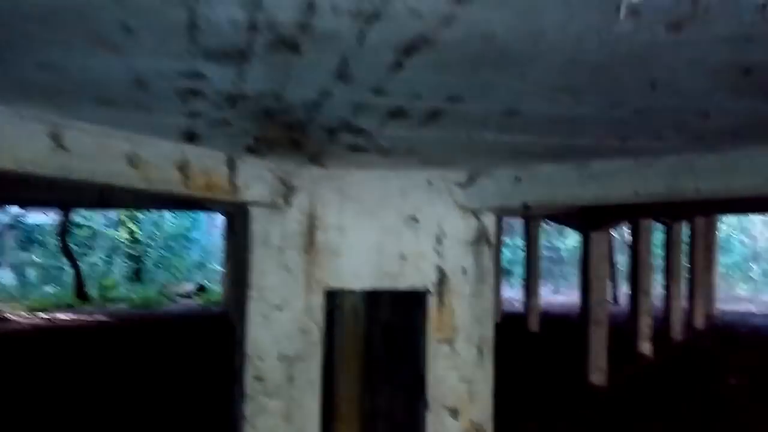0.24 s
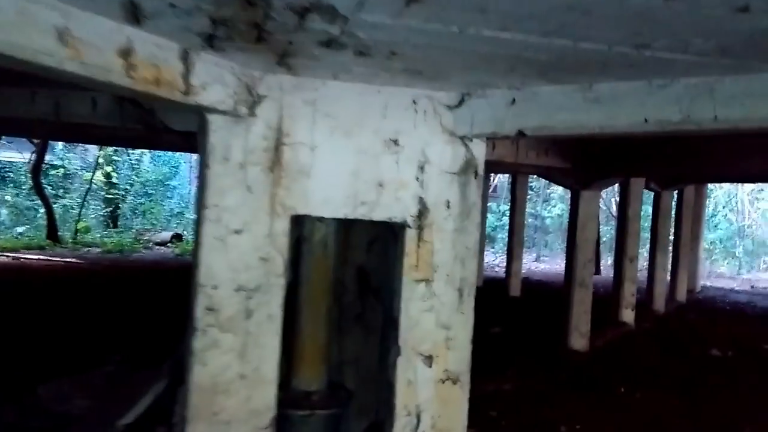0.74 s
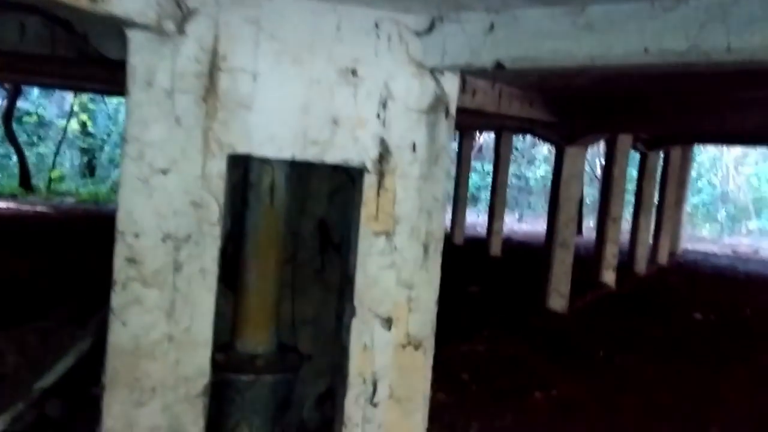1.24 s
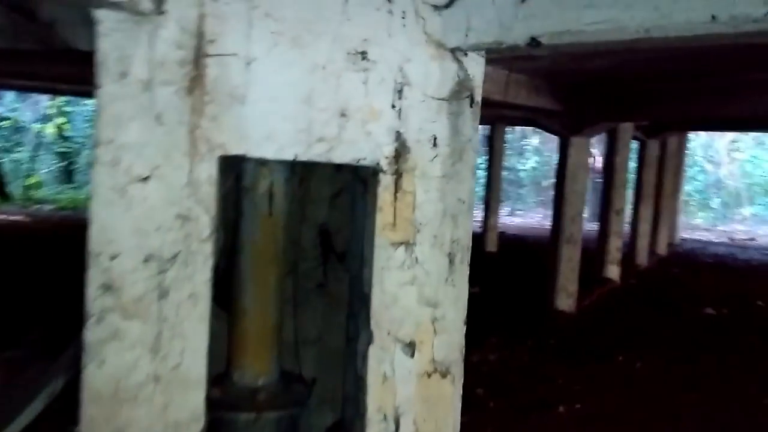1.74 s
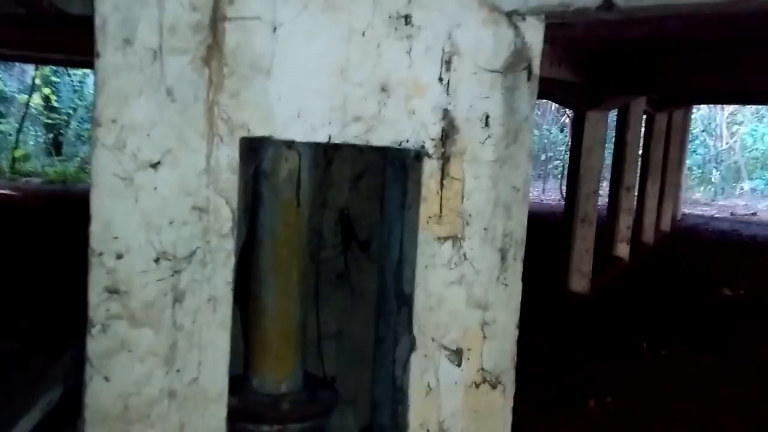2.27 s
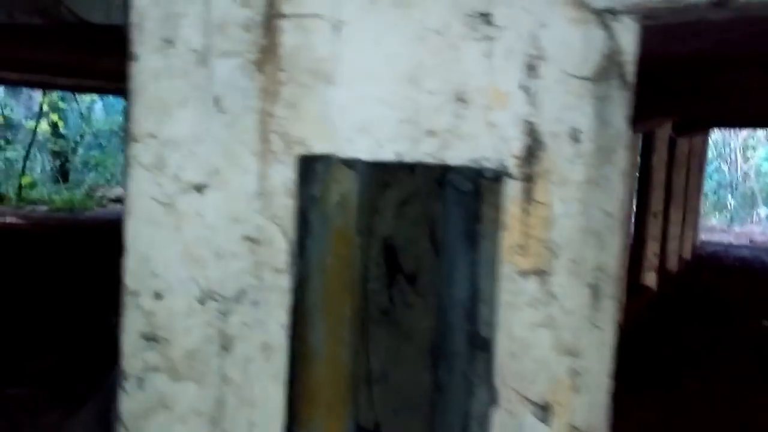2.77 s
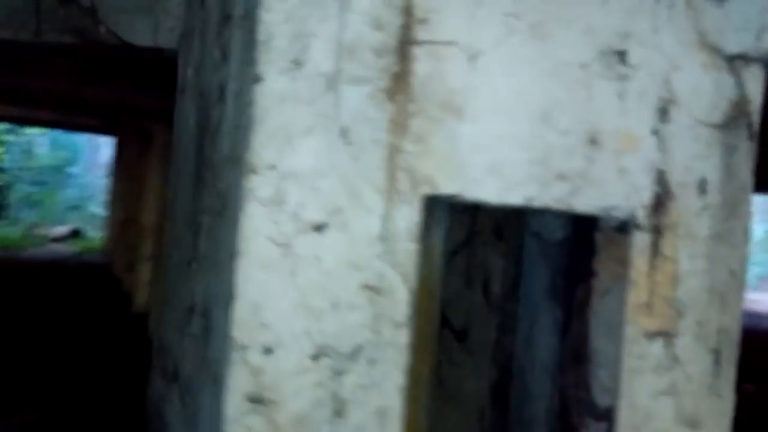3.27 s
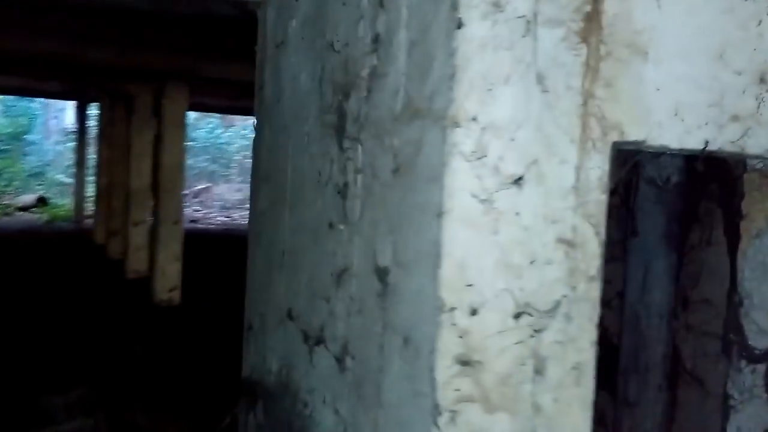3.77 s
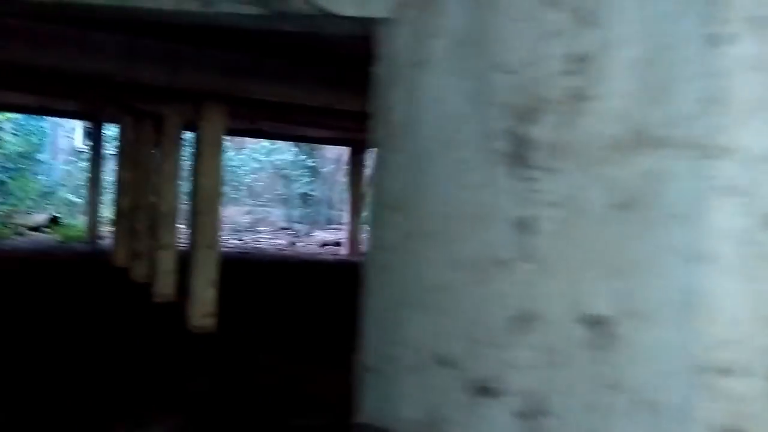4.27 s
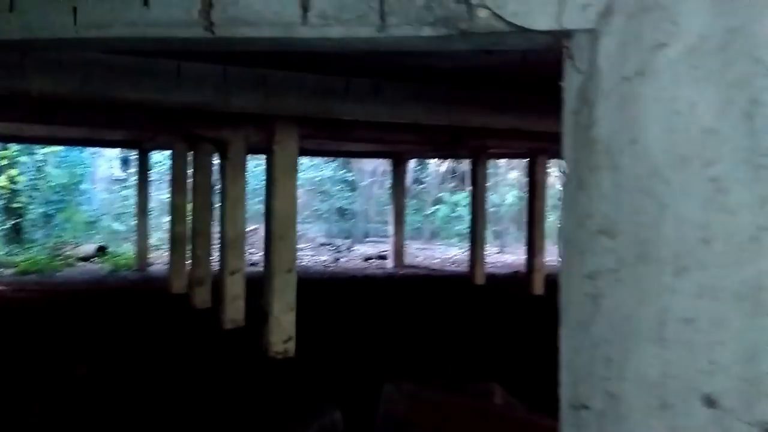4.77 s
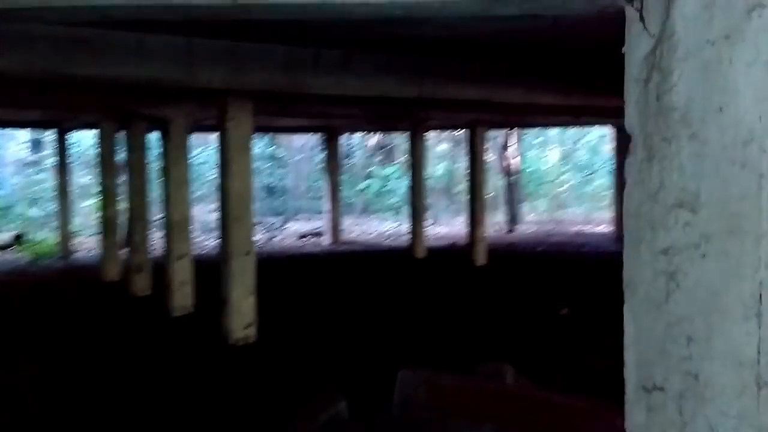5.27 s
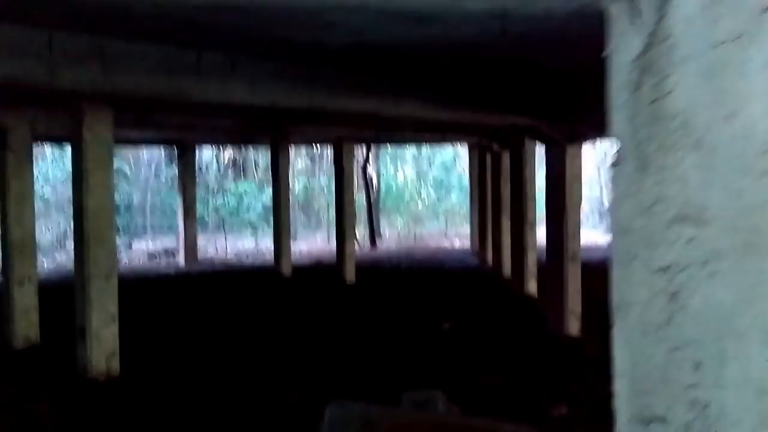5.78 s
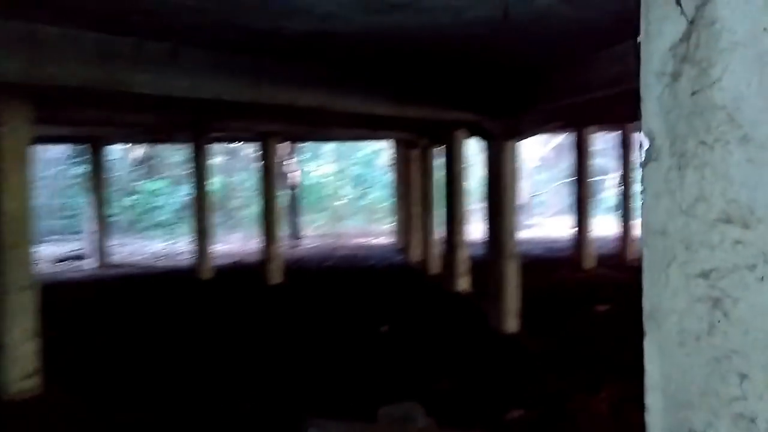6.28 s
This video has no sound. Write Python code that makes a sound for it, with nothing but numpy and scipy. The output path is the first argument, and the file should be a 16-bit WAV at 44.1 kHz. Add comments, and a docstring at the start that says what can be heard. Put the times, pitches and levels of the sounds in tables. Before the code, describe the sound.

Close, dry footsteps grind over rubble in an open concrete hall. Light chinks and snaps come first, then the crunching thickens to a dense, sharp crackle midway. A shard slides with a faint squeak, steps become sparser, and single hard cracks with dull thuds end it. Short bright echoes follow. Far traffic and one heavy engine hum low under faint hiss, picked up by a handheld microphone near the walker.

```python
"""Slow footsteps on a rubble-strewn floor in an empty concrete hall: damped rings, dense as crushed crumbs and grit.
Shards snap as runs of ringing cracks; loose pieces chink, slide, thud; thin flakes rustle; sand grains pop.
Decaying noise tails give the hall's answer. A far road rumbles as shaped noise beneath a faint hiss,
with one heavy engine, harmonics plus roar, that eases off and then pulls away."""
import sys
import numpy as np
from scipy import signal
from scipy.fft import rfft, irfft, next_fast_len
from scipy.io import wavfile
from scipy.ndimage import uniform_filter1d, map_coordinates

SR = 44100
rng = np.random.default_rng(int(sys.argv[2]) if len(sys.argv) > 2 else 0)


def wav_record(signal):
    """Record a signal, one row per channel, as 16-bit PCM in the file named by sys.argv[1]."""
    frames = np.transpose(np.atleast_2d(signal))
    bounded = np.clip(frames, -1, 1)
    # unit amplitude maps onto the largest positive 16-bit level
    quanta = np.round(bounded * 32767).astype(np.int16)
    wavfile.write(sys.argv[1], SR, quanta)


N = 287355

# All table levels are relative; gains in the code set the final ones.
# Spectrum of crushed crumbs: f/Hz, density/dB per Hz
CRUMBS = [(300, -48), (650, -40), (1000, -8.5), (1500, 0), (2000, 4), (2800, -1), (3600, 4.5), (4600, 0.5),
          (6500, 10), (14000, -48.5)]
# Spectrum of ground grit: f/Hz, density/dB per Hz
GRIT = [(1000, -17), (3000, -6.5), (4800, 1.5), (6200, -2), (8000, 3.5), (10500, 3.5), (12300, 2),
        (13500, -8), (15000, -29)]


def amp(db):
    """Decibels to gain."""
    return 10 ** (np.asarray(db) / 20)


def unit(x):
    """x at rms 1."""
    return x / np.sqrt(np.mean(x ** 2) + 1e-20)


def along(points, hz):
    """(Hz, value) points interpolated on a log-frequency axis."""
    f, v = np.transpose(points)
    return np.interp(np.log(hz + 1), np.log(f + 1), v)


def curves(rows):
    """One value per sample for each column after the time."""
    s, *cols = np.transpose(rows)
    return [np.interp(np.arange(N) / SR, s, c) for c in cols]


def wobble(knots_per_s):
    """Smooth random curve through normal-distributed knots."""
    knots = rng.standard_normal(int(N * knots_per_s / SR) + 4)
    return map_coordinates(knots, [np.arange(N) * knots_per_s / SR])


def filtered(x, response):
    """x times a response of frequency."""
    n = x.shape[-1]
    m = next_fast_len(n + 8192)
    return irfft(rfft(x, m) * response(np.fft.rfftfreq(m, 1 / SR)), m)[..., :n]


def coloured(x, points):
    """x shaped by (Hz, dB) points, at rms 1."""
    return unit(filtered(x, lambda hz: amp(along(points, hz))))


def add(track, s, sound):
    """Mix a sound into a track from time s."""
    start = max(round(s * SR), 0)
    room = track[..., start:start + sound.shape[-1]]
    room += sound[..., :room.shape[-1]]


def spiky(shape, scatter_db, size=12):
    """Noise of rms 1 in short spikes, size samples each, of unequal strength."""
    rows, length = shape
    spikes = np.repeat(rng.standard_normal((rows, length // size + 1)), size, axis=1)[:, :length]
    return unit(rng.standard_normal(shape) * amp(scatter_db * np.minimum(spikes, 2)))


def narrow(hz, knots_per_s):
    """Narrow-band noise of rms 1 about a steady or moving pitch; faster knots widen the band."""
    phase = 2 * np.pi * np.cumsum(hz * np.ones(N)) / SR
    return unit(wobble(knots_per_s) * np.sin(phase) + wobble(knots_per_s) * np.cos(phase))


def grains(rate, hz, spread, cycles, scatter_db, size=160):
    """Tiny fractures: damped rings, rate per s, at random times, pitches (+-spread octaves), strengths; rms 1."""
    when, pitch, strength, sign = rng.random((int(rate * N / SR), 4)).T
    f = np.clip(hz * 2 ** (spread * (2 * pitch - 1)), 50, SR / 2)[:, None]
    turns = f * np.arange(size) / SR
    gain = np.sign(sign - .5) * amp(scatter_db * np.minimum(-np.log(1 - strength), 5))
    rings = gain[:, None] * np.sin(2 * np.pi * turns) * np.exp(-turns / cycles)
    index = (when * N).astype(int)[:, None] + np.arange(size)
    return unit(np.bincount(index.ravel(), rings.ravel(), N)[:N])


def patchy(x, depth_db, span_hz=260, life_s=0.032):
    """Colour that shifts in random gain patches over time and pitch; rms 1."""
    hz, t, z = signal.stft(x, SR, nperseg=512)
    rows, columns = np.meshgrid(hz / span_hz, t / life_s, indexing="ij")
    field = map_coordinates(rng.standard_normal((230, 700)), [rows, columns])
    return unit(signal.istft(z * amp(depth_db * field), SR, nperseg=512)[1][:N])


def splinter(x, life_s, count=7):
    """Share the energy of one crack among a run of cracks that weaken with delay."""
    age = np.append(0, rng.uniform(0, 2, count))
    weight = np.exp(-age) * np.append(1, rng.uniform(-1, 1, count))
    run = np.zeros(len(x))
    for a, w in zip(age, weight):
        run += w * np.pad(x, (round(a * life_s * SR), 0))[:len(x)]
    return run * np.linalg.norm(x) / np.linalg.norm(run)


def press(s, length_s, release_s):
    """Envelope of a sole on the floor: exponential rise up to time s, hold, exponential release."""
    attack_s = 0.015  # time constant, as is release_s
    t = np.arange(N) / SR - s
    log_gain = np.minimum(t, 0) / attack_s - np.maximum(t - length_s, 0) / release_s
    return np.exp(np.maximum(log_gain, -np.log(1e9)))


def echo(x, early_db=5, early_s=0.0039):
    """Hall's (mid, side) answer: dense reflections from floor and pillar, then a tail with its own t60 per band."""
    # Decay: f/Hz, t60/s
    hall = [(200, 0.073), (1300, 0.32), (4000, 0.27), (12000, 0.17)]
    hz, t, z = signal.stft(spiky((2, SR * 3 // 4), scatter_db=4), SR, nperseg=256)
    decay = amp(-60 * t / along(hall, hz)[:, None]) * (1 + amp(early_db) * np.exp(-t / early_s))
    decay /= np.linalg.norm(decay, axis=1, keepdims=True)
    tail = signal.istft(z * decay, SR, nperseg=256)[1]
    tail = np.pad(tail / np.linalg.norm(tail[0]), ((0, 0), (70, 0)))  # delay in samples
    return signal.fftconvolve(x[None], tail, axes=1)


def port(x, notch_hz, depth=0.87, fade_hz=9500):
    """Inverted echo in a microphone's duct: evenly spaced notches, shallower toward the treble."""
    return filtered(x, lambda hz: 1 - depth * np.exp(-(hz / fade_hz) ** 2 - 2j * np.pi * hz / notch_hz))


def hiss():
    """Faint (mid, side) noise with a slightly wavering level."""
    # Spectrum: f/Hz, density/dB per Hz
    spectrum = [(200, 0), (1300, 0), (3300, 13), (5000, 23), (9000, 14), (10300, 6), (11300, 30),
                (12500, 31), (14500, 12)]
    return amp(-70.5 + 0.8 * wobble(7)) * coloured(rng.standard_normal((2, N)), spectrum)


def traffic(rumble_db=-56, roar_db=-5):
    """Patchy road rumble; an engine's exhaust roar and fluttering cycle-rate harmonics swell as it pulls."""
    # Engine speed: t/s, cycle rate/Hz
    speed = [(0.0, 35.27), (0.7, 34.15), (1.6, 31.72), (2.5, 32.25), (3.14, 31.17), (3.6, 31.52),
             (4.3, 32.77), (4.7, 33.38), (5.17, 34.52), (5.68, 35.59), (6.1, 36.45), (6.52, 37.22)]
    # Engine swell: t/s, low tones/dB, middle tones/dB, upper tones and roar/dB
    pull = [(0.0, -59, -55, -61), (0.38, -54, -58.5, -69.5), (0.6, -56, -52.5, -52), (1.15, -56, -58, -60),
            (1.6, -59, -66, -64), (2.65, -69, -67, -63), (3.1, -62.5, -53, -48.5), (3.55, -59, -59, -43.5),
            (3.75, -64, -49.5, -62), (4.05, -56, -60, -54), (4.22, -56.5, -55.5, -48.5),
            (4.68, -57.5, -46, -45), (5.05, -52, -52.5, -52), (5.38, -65, -48.5, -47.5),
            (5.65, -65, -53, -54), (5.87, -63, -50, -54.5), (6.52, -52.5, -48, -49)]
    # Engine tones: multiple of cycle rate, level/dB
    orders = [(3, -18.5), (4, -9), (5, -6), (6, -9.5), (7, -6.5), (8, -13.5), (9, -5), (10, -14)]
    # Exhaust roar spectrum: f/Hz, density/dB per Hz
    roar_spectrum = [(120, -39.5), (200, -1.5), (300, 8), (410, -1.5), (600, -26), (1000, -34)]
    # Road spectrum: f/Hz, density/dB per Hz
    rumble_spectrum = [(20, -17.5), (55, -18), (80, -5), (130, -2.5), (180, 3), (300, 5), (360, -6),
                       (470, -12.5), (800, -19), (1400, -50), (2200, -77), (5000, -39.5)]
    split_hz = (185, 250)  # low | middle | upper tones
    fade_db, fade_knots_per_s = 2.1, 4
    flutter_gain, flutter_knots_per_s = 0.4, 16

    hz, levels_db = curves(speed)[0], curves(pull)
    turns = np.cumsum(hz) / SR
    roar = coloured(rng.standard_normal(N), roar_spectrum)
    roar = patchy(roar, depth_db=3.0, span_hz=113.5, life_s=0.12)
    engine = amp(roar_db + levels_db[-1]) * roar
    for k, db in orders:
        pull_db = levels_db[np.searchsorted(split_hz, k * hz.mean())]
        tone = np.sqrt(2) * np.sin(2 * np.pi * (k * turns + rng.random()))
        tone += flutter_gain * narrow(k * hz, flutter_knots_per_s)
        engine += amp(db + pull_db + fade_db * wobble(fade_knots_per_s)) * tone
    engine *= amp(1.3 * wobble(14))

    noise = coloured(rng.standard_normal((2, N)), rumble_spectrum)
    rumble = np.array([patchy(x, depth_db=3.0, span_hz=101.6, life_s=0.12) for x in noise])
    return amp(rumble_db) * rumble + [engine, np.zeros(N)]


def thuds(swell_s=0.028, width=0.095):
    """Loose slabs underfoot: soft hollow narrow-band noise that swells and dies as a dull boom."""
    # Thuds: t/s, level/dB, f/Hz
    slabs = [(0.498, -53.5, 338), (0.75, -54.5, 360), (1.02, -57, 634), (1.27, -46, 339),
             (1.83, -45.5, 328), (1.86, -46.5, 506), (2.247, -46.5, 335), (2.598, -49.5, 350),
             (2.8, -47.5, 322), (3.47, -48, 394), (3.57, -47.5, 348), (3.72, -54.5, 332),
             (3.86, -55, 420.6), (4.29, -53.5, 396), (4.63, -46.5, 350), (4.769, -51.5, 630),
             (5.57, -46, 397), (5.575, -62, 666), (6.321, -54, 596), (6.41, -46.5, 333),
             (6.415, -46.5, 795)]
    out, t = np.zeros(N), np.arange(SR // 2) / SR
    swell = t / swell_s * np.exp(1 - t / swell_s)
    for s, db, hz in slabs:
        noise = rng.standard_normal(len(t))
        boom = swell * filtered(noise, lambda f: np.exp(-.5 * ((f / hz - 1) / width) ** 2))
        add(out, s, amp(db) * boom * np.linalg.norm(swell) / np.linalg.norm(boom))
    return out


def flakes(release_s=0.016):
    """Thin dry flakes brushed by a foot crinkle in many small, high cracks."""
    # Rustles: t/s, length/s, level/dB
    rustles = [(0.556, 0.035, -72), (0.786, 0.024, -62), (1.498, 0.063, -53.5), (1.6, 0.029, -52.5),
               (2.337, .06, -46.5), (2.471, 0.062, -49), (3.09, 0.037, -44), (3.8, 0.17, -76),
               (4.249, 0.099, -64), (4.606, 0.057, -69.5), (4.75, 0.045, -59), (5.365, .05, -80),
               (6.053, .15, -78)]
    # Spectrum: f/Hz, density/dB per Hz
    spectrum = [(1500, -27), (2600, 1), (3500, 6.5), (4200, -9), (6000, -19), (9000, -47)]
    power = sum((amp(db) * press(s, length_s, release_s)) ** 2 for s, length_s, db in rustles)
    cracks = grains(rate=770, hz=3390, spread=0.69, cycles=2.5, scatter_db=3.5)
    return np.sqrt(power) * coloured(cracks, spectrum)


def pops(gain_db=1, crack_t60_s=0.0069, splinter_s=0.0014, room_db=-3):
    """Hard sand grains burst under the sole, each a bright, very short run of cracks."""
    # Bursts: t/s, level/dB
    bursts = [(0.386, -35), (0.506, -40), (0.571, -44), (0.687, -38), (0.722, -43), (0.733, -37),
              (1.005, -38), (1.057, -24), (1.151, -28), (1.221, -26.5), (1.469, -37), (1.609, -39),
              (2.158, -33.5), (2.477, -45), (2.906, -39.5), (3.05, -25), (3.09, -40), (3.131, -34),
              (3.142, -41.5), (4.345, -50)]
    out, t = np.zeros((2, N)), np.arange(SR // 40) / SR
    for s, db in bursts:
        crack = coloured(rng.standard_normal(len(t)), GRIT) * amp(db + gain_db - 60 * t / crack_t60_s)
        crack = splinter(crack, splinter_s)
        add(out[0], s, crack)
        add(out, s, amp(room_db) * echo(crack, early_db=-10, early_s=.003))
    return out


def drag(rub_db=-13, squeak_db=-12.0, squeak_knots_per_s=220):
    """A sliding shard catches on rough ground and rings; its edge squeaks at a pitch that shifts as it turns."""
    # Slide: t/s, level/dB, squeak f/Hz
    slide = [(3.9, -63, 1306), (4.04, -50, 1393), (4.11, -45, 1470), (4.16, -52, 1681), (4.22, -46.5, 1465),
             (4.3, -44, 1535), (4.42, -49.5, 1464), (4.52, -75, 1400)]
    # Shard resonances: f/Hz, width/Hz, level/dB
    modes = [(1292, 54, 8.5), (1730, 65, 0.5), (3380, 110, 0)]
    level_db, hz = curves(slide)
    catches = grains(rate=110, hz=2150, spread=0.71, cycles=0.98, scatter_db=1.0)

    def body(f):
        """Sum of resonant band-passes."""
        return sum(amp(db) * 1j * f * w / (c * c - f * f + 1j * f * w) for c, w, db in modes)

    rub = unit(filtered(catches, body))
    squeak = unit(narrow(hz, squeak_knots_per_s) * amp(2.5 * wobble(35)))
    return amp(level_db) * (amp(rub_db) * rub + amp(squeak_db) * squeak)


def chinks(attack_s=0.0013, t60_s=0.061, overtone=2.4, overtone_db=-14, rattle_rad=0.2, room_db=-4):
    """A nudged piece tips over and rings at its own pitch; phase jitter makes it rattle a little."""
    # Loose pieces: t/s, level/dB, f/Hz
    pieces = [(0.133, -33, 1735), (0.135, -41.5, 815), (0.206, -31.5, 847), (0.21, -30, 1884),
              (0.968, -46.5, 3490), (1.071, -32.5, 1190), (1.157, -30.5, 1255), (1.4, -46, 1230),
              (1.581, -33, 1274), (4.063, -46, 3385), (4.122, -49, 1410), (4.246, -48, 3310),
              (4.299, -41.5, 957), (4.327, -40, 915), (4.46, -50, 977), (4.642, -52, 1155),
              (5.086, -57, 1117), (5.174, -55, 1114), (5.316, -53.5, 1500), (5.409, -44.5, 1260),
              (5.493, -49, 1650), (5.533, -45.5, 1480), (5.65, -36.5, 979), (6.133, -51.5, 1270),
              (6.263, -56, 1595)]
    out, t = np.zeros((2, N)), np.arange(SR // 8) / SR
    for s, db, hz in pieces:
        jitter = unit(uniform_filter1d(rng.standard_normal(len(t)), size=90))
        phase = 2 * np.pi * hz * t + rattle_rad * jitter
        ring = np.sin(phase) + amp(overtone_db) * np.sin(overtone * phase)
        ring *= amp(db - 60 * t / t60_s) * (1 - np.exp(-t / attack_s))
        add(out[0], s, ring)
        add(out, s, amp(room_db) * echo(ring, early_db=-25, early_s=0.0037))
    return out


def plaster(x, low_hz, high_hz=4200):
    """Small soft pieces radiate little bass and little treble."""
    return filtered(x, lambda f: f ** 3 / (f ** 3 + low_hz ** 3) / (1 + (f / high_hz) ** 10))


def snaps(overtone=2.14, crumble_db=-29, chink_db=-22):
    """A shard splinters in a quick run of cracks, short rings with a bright edge, then crumbles for a moment."""
    # Shards: t/s, level/dB, treble edge/dB, f/Hz, overtone/dB, room/dB, splintering time/s
    shards = [(0.0189, -14, -29, 1690, 5.5, -6, 0.00049), (0.135, -20, 1.5, 1680, -29, 2.5, 0.0016),
              (0.195, -18, -28, 1720, -8, 15, 0.0027), (0.209, -8, -29, 1700, -5, -10, 0.0022),
              (0.359, -16, -12, 1760, -15, 0.5, .0015), (0.625, -12.5, -23, 1477, 2, 0.5, 0.00027),
              (0.746, -17, -13, 1700, 3.5, -8, 0.0016), (0.757, -13, -28, 1400, -9, -5, 0.0019),
              (0.767, -15, -39, 1290, -19, 3.5, .003), (0.794, -22.5, -31, 1590, -1, 6, 0.0017),
              (0.832, -17, -24, 1370, -4.5, 1, .003), (1.109, -16, -17, 1350, -15, 5, .002),
              (1.184, -12, -12, 1292, -6.5, 11, 0.0041), (1.396, -14.5, -18.5, 1406, -24, 0.5, 0.00089),
              (1.519, -16.5, -40, 1520, 4, -4.5, 0.00061), (1.578, -15, -38, 1300, -2, -13, 0.00084),
              (1.835, -11.5, -23, 1100, 2, 7.5, 0.0043), (1.91, -25, 7.5, 1150, -5, 7.5, .0035),
              (2.034, -10.5, -10, 1750, -6, -3, 0.00061), (2.04, -6.5, -14.5, 3280, -9, -2.5, .0057),
              (2.284, -13.5, -24, 1680, 1, 0, 0.0019), (2.292, -5.5, -45, 1610, -2.5, 0.5, .0018),
              (2.612, -6.5, -4.5, 3640, -1, 5.5, .0012), (2.6218, -12, 3.5, 1440, 3, -6, 0.00057),
              (2.763, -16, -3.5, 1490, -12, -1, .0038), (2.899, -6.5, -7, 1225, 0, 2.5, 0.0047),
              (2.956, -4.5, -20, 1805, -19, 1, 0.0048), (3.027, -16.5, -3, 1580, -2, -3, .0044),
              (3.099, -15, -0.5, 1700, -2, -3, 0.0012), (3.114, -3, -9, 1830, -2, -0.5, 0.0013),
              (3.186, -19, -14, 1680, 2, 5, .0038), (3.199, -19, -1, 1650, 3, 4.5, 0.0032),
              (3.224, -7.5, -41, 1900, -3, -7, .0036), (3.277, -17, -14.5, 1840, 6.5, 4.5, .0029),
              (3.419, -5.5, -17, 3630, -4, 1, .0025), (3.459, -2.5, -36, 1440, -4, 1.5, 0.0053),
              (3.768, -35.5, -1, 3290, 7, 6.5, .0034), (3.975, -22.5, -42, 3038, -19, 0, .002),
              (4.053, -22.5, -23, 1640, -9, 1, 0.0028), (4.294, -15.5, -44, 1520, -1.5, 3, 0.0078),
              (4.325, -17, -33, 1500, -4, -4, 0.0056), (4.4505, -23, -2, 3010, 8, -1, 0.0027),
              (4.712, -17.5, -25, 1500, 10.5, -1.5, 0.00019), (4.777, -18, -30, 1560, 1, -3, .003),
              (4.789, -7.5, -55, 1340, -6, 0.5, 0.00033), (4.79, -12, -33, 3220, -15, -9, 0.0014),
              (5.404, -26.5, -19.5, 1556, 2.5, 3, .0056), (5.599, -16.5, -24, 3540, -14, -2, 0.0027),
              (5.645, -4.5, -31, 1360, -2.5, -2, 0.0046), (5.736, -27.5, -6, 3300, -3, 1.5, .005),
              (5.792, -17, -36, 1650, -24, -3.5, 0.0035), (6.329, -32.5, -28, 1500, -3, 9, 0.0067),
              (6.422, -6, -36, 1454, 2, 1, 0.0068), (6.5, -10.5, -27, 1600, 0, -1, .0042)]
    ring_t60_s, edge_t60_s, crumble_t60_s, chink_t60_s = 0.0045, 0.0065, 0.045, 0.078
    out, t = np.zeros((2, N)), np.arange(SR // 16) / SR
    for s, db, edge_db, hz, overtone_db, room_db, splinter_s in shards:
        tone = np.sin(2 * np.pi * hz * t)
        ring = tone * amp(-60 * t / ring_t60_s)
        ring -= np.sin(2 * np.pi * overtone * hz * t) * amp(overtone_db - 60 * t * overtone / ring_t60_s)
        ring += tone * amp(chink_db - 60 * t / chink_t60_s)
        crumble = coloured(spiky((1, len(t)), scatter_db=5.5)[0], CRUMBS)
        crumble *= amp(crumble_db - 60 * t / crumble_t60_s)
        body = np.pad(splinter(ring, splinter_s) + crumble, (24, 0))  # edge leads by 24 samples
        body = plaster(body, low_hz=0.78 * hz)[:len(t)]  # the smaller the shard, the less bass
        edge = coloured(rng.standard_normal(len(t)), GRIT) * amp(edge_db + 2.5 - 60 * t / edge_t60_s)
        crack = amp(db - 9.0) * (body + splinter(edge, splinter_s))
        add(out[0], s, crack)
        add(out, s, amp(room_db) * echo(crack, early_db=-3.5, early_s=0.0023))
    return out


def clinkers(level_db, gain_db=-15):
    """Under weight, a few larger flat pieces rock and ring at their own low pitches."""
    rings = grains(rate=100, hz=1030, spread=0.67, cycles=12.6, scatter_db=2.0, size=2600)
    return rings * amp(level_db + gain_db)


def tread():
    """Levels in dB of crumbs, grit and scrape: power sums over footfalls, scuffs and trickling sand."""
    # Footfalls that take the body's weight: t/s, press length/s, crumbs/dB, grit/dB, dull scrape/dB
    steps = [(0.201, 0.017, -40, -41.5, -38.5), (1.11, 0.097, -32.5, -37, -29),
             (1.842, 0.057, -26, -36, -21.5), (2.135, 0.043, -31, -39.5, -39),
             (2.594, 0.073, -29.5, -39.5, -24), (2.751, 0.065, -27.5, -38, -28.5),
             (2.96, 0.025, -44, -48, -32.5), (3.037, 0.037, -29.5, -37, -25.5),
             (3.18, 0.027, -42, -46, -44.5), (3.429, 0.063, -26.5, -45.5, -30.5),
             (4.3, 0.023, -46, -57, -61.5), (4.781, 0.0041, -69, -54, -37.5),
             (5.654, 0.0053, -38.5, -69, -56), (6.419, 0.024, -26, -44, -42)]
    # Light scuffs as a sole brushes, rolls or lifts: t/s, length/s, crumbs/dB, grit/dB
    scuffs = [(0.0, 0.0031, -34.5, -39), (0.174, 0.1, -38.5, -48), (0.332, 0.048, -43, -40.5),
              (0.561, 0.014, -55, -47.5), (0.637, 0.05, -44, -51), (0.765, 0.054, -46.5, -52),
              (1.003, 0.016, -48, -36.5), (1.031, 0.051, -32, -37), (1.357, 0.12, -52, -47.5),
              (1.523, 0.035, -40.5, -70), (1.59, 0.025, -45, -70), (1.617, 0.0098, -55, -42.5),
              (1.746, 0.075, -58, -47), (1.82, 0.026, -42, -37.5), (1.93, 0.06, -29, -39),
              (2.043, 0.037, -32, -44), (2.231, 0.26, -40.5, -41), (2.568, 0.058, -33.5, -33.5),
              (2.68, 0.095, -32.5, -46), (2.895, 0.095, -29.5, -40.5), (3.143, 0.084, -29.5, -45),
              (3.268, 0.078, -35, -42), (3.427, 0.0078, -59, -33.5), (3.557, 0.025, -38.5, -45),
              (3.887, 0.021, -55.5, -54), (4.03, 0.23, -53.5, -77), (4.25, 0.025, -51, -66),
              (4.34, 0.021, -62, -64), (4.452, 0.036, -57, -48), (4.707, 0.093, -51, -56),
              (5.297, 0.047, -58, -80), (5.43, 0.16, -59.5, -64), (5.591, 0.044, -43.5, -60),
              (5.739, 0.0091, -51, -50), (6.38, 0.091, -46, -47)]
    # Loose sand trickling between steps, thick by the pillar, thin beyond it: t/s, level/dB
    trickle = [(0.0, -47), (0.75, -51.5), (0.9, -53), (1.3, -46.5), (3.4, -57), (3.8, -60), (5.3, -64),
               (6.0, -72), (6.52, -54.5)]
    stance_crumbs_db, stance_scrape_db = -66.5, -64.5  # shifting stance
    crumbs_release_s, grit_release_s, weight_release_s = 0.037, 0.057, 0.042
    weight_lag_db = 14  # weight arrives late: this far down at first contact

    t = np.arange(N) / SR
    crumbs = amp(stance_crumbs_db) ** 2
    grit = amp(curves(trickle)[0]) ** 2
    scrape = amp(stance_scrape_db) ** 2
    for s, length_s, crumbs_db, grit_db, *_ in steps + scuffs:
        crumbs = crumbs + (amp(crumbs_db) * press(s, length_s, crumbs_release_s)) ** 2
        grit = grit + (amp(grit_db) * press(s, length_s, grit_release_s)) ** 2
    for s, length_s, _, _, scrape_db in steps:
        unloaded = 1 - np.clip((t - s) / length_s, 0, 1)
        weight = amp(scrape_db - weight_lag_db * unloaded ** 2)
        scrape = scrape + (weight * press(s, length_s, weight_release_s)) ** 2
    return 10 * np.log10([crumbs, grit, scrape])


def brighten(x, force_db, slope, corner_hz):
    """A harder crush breaks finer pieces: treble grows faster than the rest (slope in dB per dB)."""
    treble = filtered(x, lambda f: f ** 8 / (f ** 8 + corner_hz ** 8))
    return x + treble * (amp(slope * (force_db - force_db.max())) - 1)


def crunch(coarsening=0.61):
    """Crumbs break in clumps, chips chink together, grit crackles finely, the loaded sole scrapes dully."""
    # Spectrum of the sole's scrape: f/Hz, density/dB per Hz
    scrape_spectrum = [(150, -32), (330, 4), (480, -9.5), (650, -2), (850, 8), (1100, 10), (1800, 15),
                       (4000, -55)]
    # Spectrum of fine sand: f/Hz, density/dB per Hz
    sand_spectrum = [(4000, -25), (6500, -7.5), (8000, -5.5), (10500, -0.5), (12300, 2), (13500, -5),
                     (15000, -32)]
    # Spectrum of each footfall's soft bump: f/Hz, density/dB per Hz
    bump_spectrum = [(20, 1), (60, 8.5), (120, 2.5), (250, -33)]
    crumbs_db, grit_db, scrape_db = tread()
    slip = wobble(60)  # the sole sticks and slips

    crumbs = coloured(grains(rate=1100, hz=1890, spread=1.4, cycles=0.8, scatter_db=1.0), CRUMBS)
    crumbs = patchy(crumbs, depth_db=2.2)
    chips = grains(rate=230, hz=1817.0, spread=0.99, cycles=12.5, scatter_db=2.5, size=1500)
    chips = coloured(chips, CRUMBS)
    dry = crumbs * amp(crumbs_db - 10.5 + 0.17 * slip) + chips * amp(crumbs_db - 14.0)
    dry = brighten(dry, crumbs_db, slope=0.019, corner_hz=2500)
    dry = brighten(dry, crumbs_db, slope=0.055, corner_hz=4400)

    scrape = grains(rate=1400, hz=787, spread=0.91, cycles=1.47, scatter_db=3.0, size=500)
    dry += coloured(scrape, scrape_spectrum) * amp(scrape_db - 15.5)
    dry += drag() + flakes() + clinkers(scrape_db)
    dry += coloured(rng.standard_normal(N), bump_spectrum) * amp(scrape_db - 39.5)

    # a light touch mostly stirs fine sand; more weight grinds more of the coarser grit
    sand = coloured(grains(rate=3300, hz=9700, spread=0.47, cycles=0.82, scatter_db=4.5), sand_spectrum)
    grit = coloured(grains(rate=3800, hz=7660, spread=0.9, cycles=0.14, scatter_db=2.5), GRIT)
    grit = patchy(grit, depth_db=2.2)
    ticks = grains(rate=86, hz=8990, spread=0.43, cycles=8.5, scatter_db=2.5)  # single sand grains burst
    dry += sand * amp(grit_db - 9.5 + slip) + ticks * amp(grit_db - 16.5)
    dry += grit * amp(grit_db - 4.5 + coarsening * (grit_db - grit_db.max()) + 0.6 * slip)

    out = np.array([dry, np.zeros(N)])
    for part in np.array_split(np.arange(N), 18):  # the echoes change as the walker moves
        add(out, part[0] / SR, amp(-2.0) * echo(dry[part]))
    return out


def scene():
    """Steps and hiss through two microphone ducts, plus traffic and thuds; middle frequencies are nearly mono."""
    # Stereo width: f/Hz, gain of side/dB
    width = [(50, -3), (120, -11.5), (300, -20), (600, -22.5), (1500, -60), (3300, -34), (4600, -3),
             (14000, 3.5)]
    # Phase by which the left microphone leads in the bass: f/Hz, phase/rad
    lead = [(30, .1), (70, .75), (170, 0.44), (350, 0.27), (650, 0)]
    left_notch_hz, right_notch_hz, diffuse_db = 2377, 2184, -8
    mid, side = crunch() + snaps() + pops() + chinks() + hiss()
    side = amp(diffuse_db) * side
    left, right = port(mid + side, left_notch_hz), port(mid - side, right_notch_hz)
    mid, side = np.array([left + right, left - right]) / 2 + traffic()
    mid += thuds()
    side = filtered(side, lambda hz: amp(along(width, hz)))
    side += filtered(mid, lambda hz: 1j * np.tan(along(lead, hz) / 2))
    return np.array([mid + side, mid - side])


def record(dry):
    """Band limit: nothing is kept from 14.6 kHz up."""
    return filtered(dry, lambda hz: hz < 14600)


dry = scene()
out = record(dry)
wav_record(out)
```